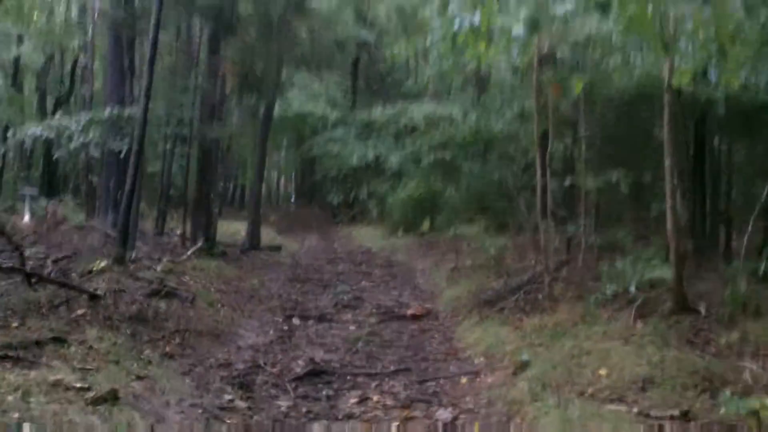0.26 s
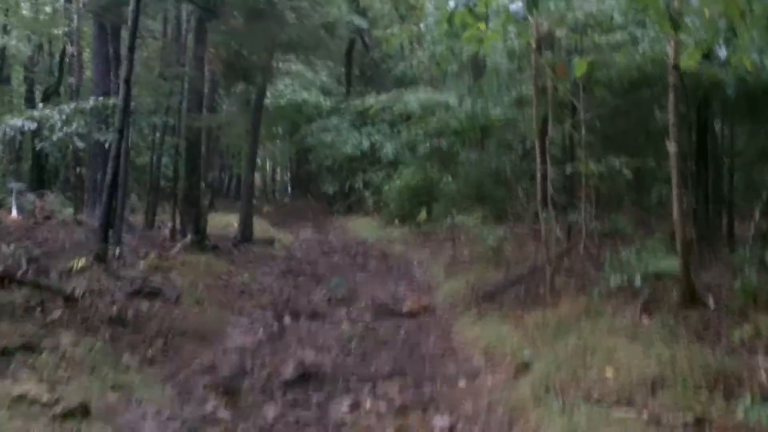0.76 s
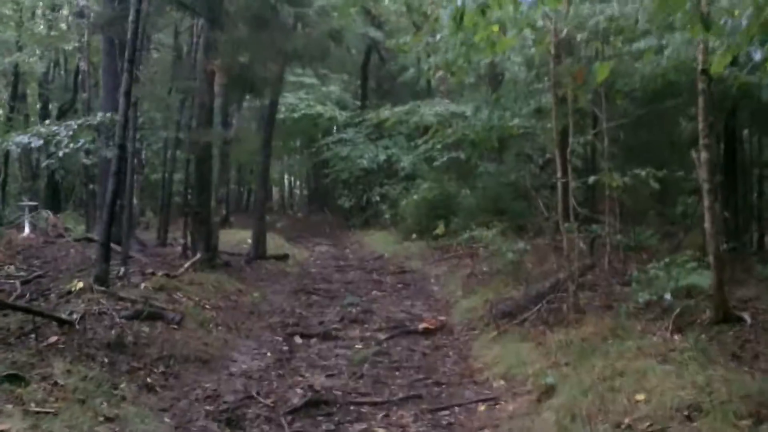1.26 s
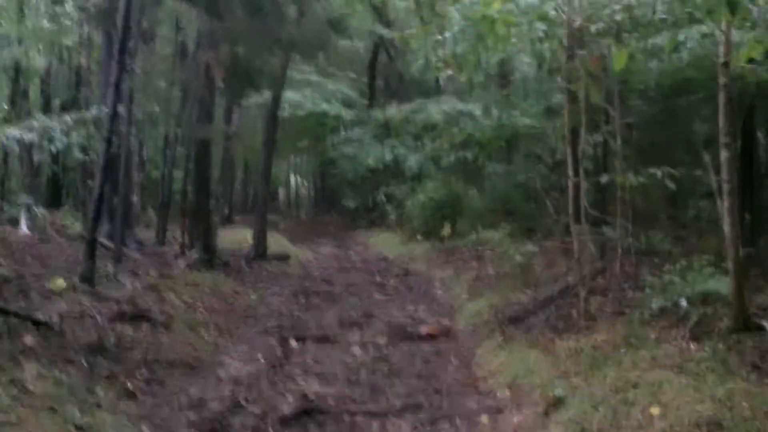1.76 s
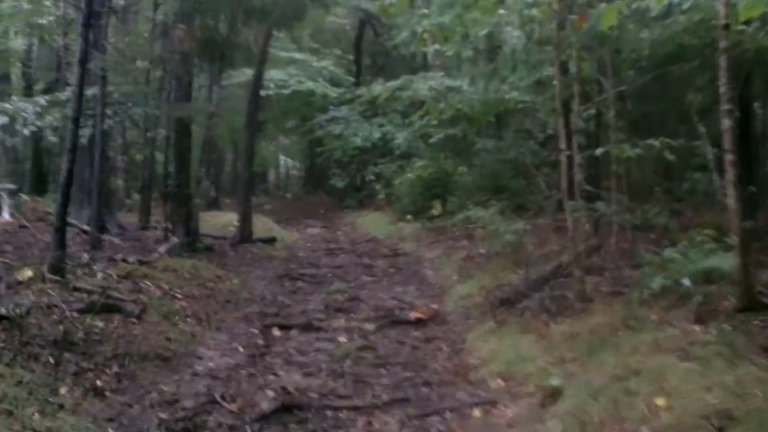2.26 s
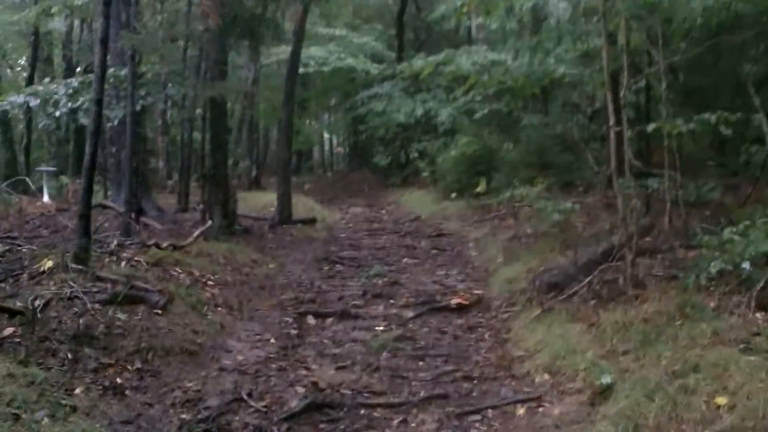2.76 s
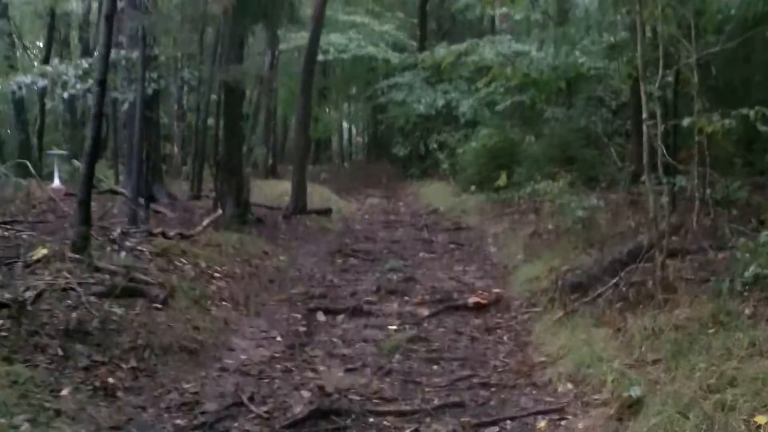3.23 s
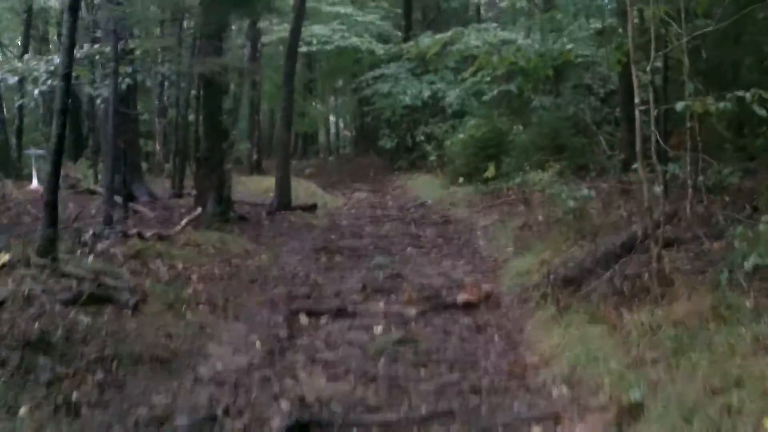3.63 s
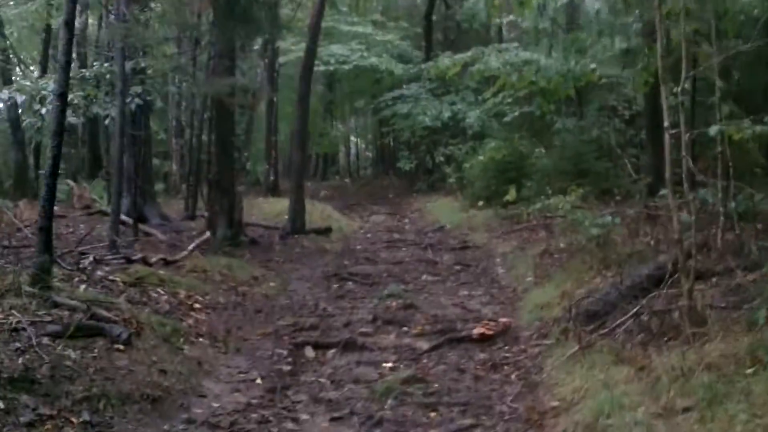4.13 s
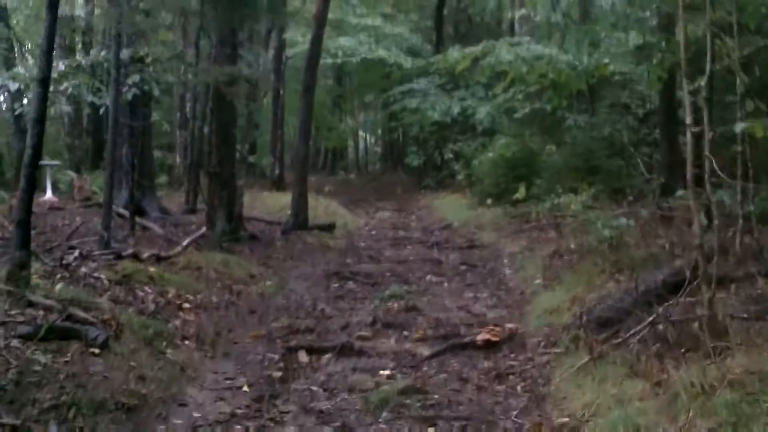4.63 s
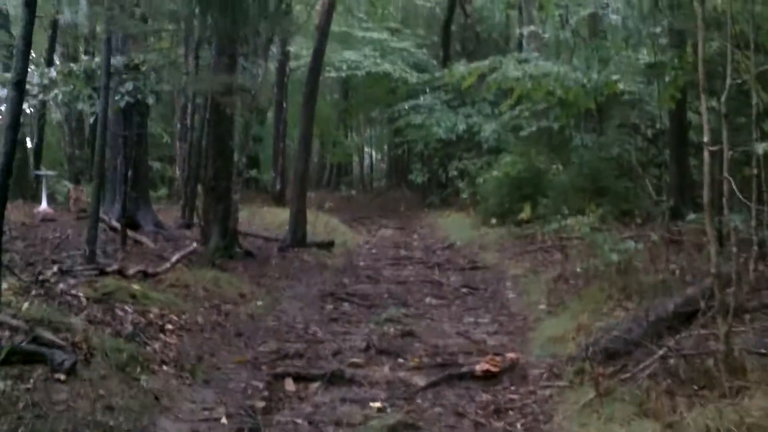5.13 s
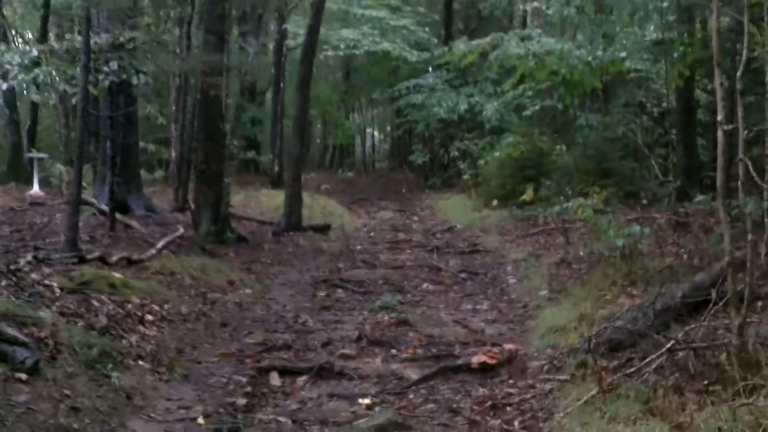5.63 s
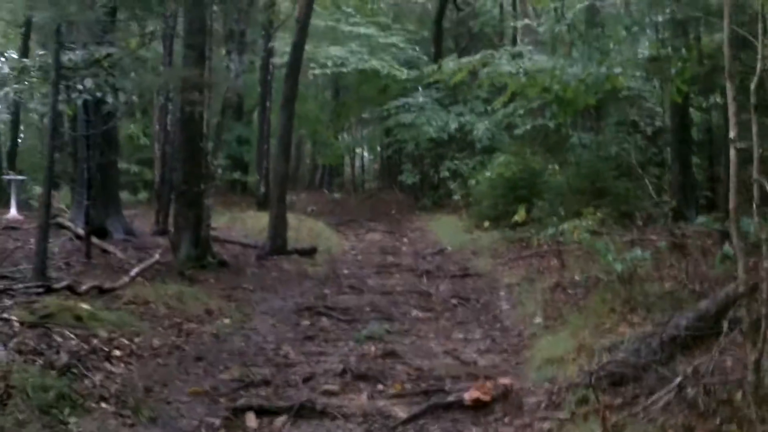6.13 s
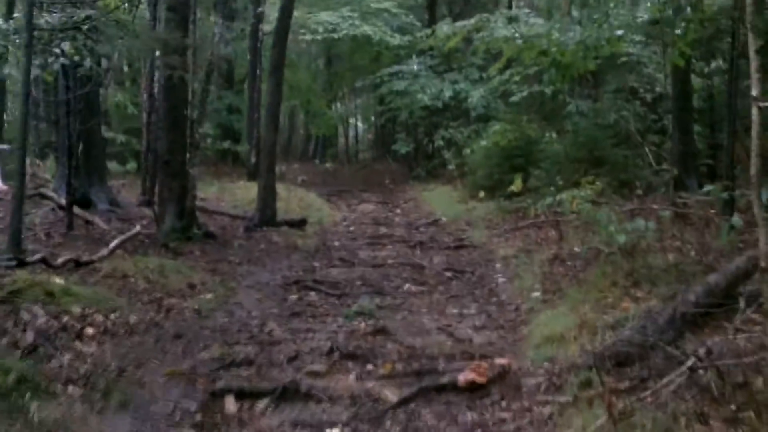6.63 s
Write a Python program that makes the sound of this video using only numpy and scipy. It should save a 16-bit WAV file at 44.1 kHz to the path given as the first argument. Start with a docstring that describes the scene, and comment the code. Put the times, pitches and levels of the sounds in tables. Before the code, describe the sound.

Soft dull footsteps and low microphone handling rumble on a wet forest trail, with water drops ticking on leaves and plopping into mud.

```python
"""Wet forest walk, hand-held

A slow walk along a trail after rain. The hand sways the camera with each pace, soft steps thud
up through the arm, and drops and jolts knock on the housing. Water flicks leaves and plops into
mud, grit ticks now and then, and countless far drops merge into a steady wash behind it all."""
import sys
import numpy as np
from scipy import signal
from scipy.fft import rfft, irfft, next_fast_len
from scipy.io import wavfile
from scipy.ndimage import uniform_filter1d, map_coordinates

SR = 44100
rng = np.random.default_rng(int(sys.argv[2]) if len(sys.argv) > 2 else 0)


def persist_wave(psi):
    """Save psi, clipped to +-1, as 16-bit WAV."""
    counts = np.round(np.clip(psi, -1, 1) * 32767).astype(np.int16)
    wavfile.write(sys.argv[1], SR, np.atleast_2d(counts).T)


N = 303408
HIT = 8192  # samples in the grid on which one-shots are built
HIT_HZ = np.fft.rfftfreq(HIT, 1 / SR)

# swings of the hand, once or twice a pace: (time [s], level [dB])
HAND_SWINGS = [(.1, -41.5), (.46, -34), (.8, -53), (1.17, -33.5), (1.44, -34.5), (2.0, -28.5), (2.499, -36),
               (2.85, -37.5), (3.5, -45), (3.95, -30), (4.2, -31), (4.68, -34), (4.95, -44), (5.41, -27.5),
               (6.19, -25.5), (6.8, -29.5)]
# fader ride of the grip's rumble: (time [s], level [dB])
GRIP_LEVEL = [(0, -43), (.2, -51), (.5, -47.5), (.8, -51.5), (1.2, -49), (1.68, -52), (1.9, -49),
              (2.35, -50), (2.85, -52.5), (3.35, -53), (3.6, -53.5), (3.8, -51), (4.15, -47), (4.4, -55.5),
              (4.7, -51.5), (5.1, -51), (5.4, -46.5), (5.65, -50), (6.2, -51), (6.4, -49), (6.88, -48.5)]
# tone of the sway, the grip, the far wash and the far patter: (frequency [Hz], level [dB])
SWAY_EQ = [(3, -33.5), (8, -12.5), (12, 2), (17, -10.5), (23, -18.5), (35, -29), (70, -64.5), (200, -120)]
GRIP_EQ = [(15, -15.5), (35, 8.5), (65, -0.5), (100, -6), (160, -12), (280, -23), (700, -49), (2000, -120)]
WASH_EQ = [(100, -37), (200, -3), (300, -0.5), (480, 2.5), (650, -1), (900, -11), (1300, -21), (3000, -57),
           (8000, -120)]
PATTER_EQ = [(300, -33), (900, 2), (1300, -0.5), (1780, 3), (2600, 0.5), (3600, 2.5), (4800, -5),
             (6500, -15), (10000, -14), (15000, -13.5)]
# resonances of the microphone's cavity that colour the hiss: (pitch [Hz], width [Hz], gain [dB])
CAVITY_MODES = [(1740, 110, -9.5), (2370, 140, -15), (4730, 250, -11)]
# soft footfalls and jolts through the arm: (time [s], peak [dB], pitch [Hz])
FOOTFALLS = [(0.071, -45, 90), (0.942, -39, 65), (1.06, -46, 110), (1.114, -44.5, 130), (1.192, -44, 111),
             (1.288, -29, 61), (2.041, -42, 74.6), (2.17, -36, 87), (2.591, -30.5, 131), (3.657, -41, 106),
             (4.95, -46, 133), (4.992, -44, 125), (5.366, -34, 90.5), (5.432, -38, 70), (5.49, -46, 110),
             (5.926, -37, 88.5), (6.179, -36.5, 111), (6.298, -49, 90.5), (6.595, -50, 95)]
# drops on near leaves and twigs: (time [s], flick peak [dB], pitch [Hz], damping [width / pitch])
LEAF_DROPS = [(.109, -55, 1900, .6), (.295, -49, 2000, .3), (.761, -47.5, 1750, 0.21),
              (.942, -45, 1720, .25), (1.071, -49, 2510, 0.56), (1.414, -52, 1250, 0.27),
              (1.47, -55, 4700, .2), (2.160, -43, 1920, .8), (2.344, -50, 2800, .4),
              (3.029, -46, 3200, 1.1), (3.686, -46, 2600, 0.69), (3.711, -50, 2430, 1),
              (3.788, -47, 2100, .4), (3.7996, -35.5, 2900, 0.7), (3.8380, -34.5, 2370, 0.43),
              (3.992, -47.5, 1800, .17), (4.077, -49, 2600, .8), (4.205, -47, 1300, 1.8),
              (4.399, -58, 3200, .5), (4.561, -45, 2800, 1), (4.613, -37, 2400, 0.74),
              (4.782, -40.5, 2530, 1.5), (5.2905, -36.5, 1950, 4), (6.000, -46.5, 2510, .8)]
# knocks on the housing: (time [s], shell gain [dB], shell pitch [Hz], shell width [Hz],
# contact cutoff [Hz], thump gain [dB], thump pitch [Hz], thump width [Hz], ring gain [dB],
# snap gain [dB], rebound delay [s], rebound gain [dB], hollow centre [Hz], hollow depth [0-1])
HOUSING_KNOCKS = [(0.3597, 17.5, 612, 119, 347, 18, 197, 290, -65, -35.7, 0.0026, -15.5, 439, .54),
                  (.6260, 32, 575, 333, 890, 25.5, 151, 190, -41, -30, .004, -25, 333, .92),
                  (2.2986, 6.5, 339, 842, 2570, 11.5, 134, 57, -55, -9, 0.0024, -25, 345, 0.27),
                  (2.6012, 43.5, 467, 314, 58.6, 35, 160, 75, -16.5, -39, 0.0054, -20, 345, 0.65),
                  (3.8392, 47, 420, 510, 31.3, 40.5, 85, 67, -60, -53, .0084, -15.5, 310, 0.75),
                  (4.2111, 34, 238, 112, 24, 34.5, 113, 47, -61, -50, 0.0054, -13, 320, 0.7),
                  (6.6644, 26, 330, 231, 82, 23, 125, 19, -38, -67, .0018, -11, 357, 1)]
# ringing modes of the housing: (pitch [Hz], level [dB], 60 dB decay [s])
HOUSING_MODES = [(692, 6.5, .033), (840, 1, 0.016), (1008, -14.5, 0.046), (1630, -6.5, .011),
                 (1720, -29, .04), (2260, -18.5, 0.0091), (3190, -15.5, 0.012)]
# the bite that a hard contact adds: (pitch [Hz], width [Hz], gain [dB])
SNAP_MODES = [(1835, 74, 12.5), (3080, 1140, 19), (5280, 670, -1.5), (10300, 9600, -3.5), (13700, 2000, -2)]
# drops on mud: (time [s], peak [dB], pitch [Hz], half-length [cycles])
MUD_DROPS = [(0.57, -43, 524, 0.39), (0.9418, -43, 563, 0.33), (1.119, -37.5, 370, 0.3),
             (1.2855, -46, 750, 0.3), (1.966, -43, 395, 0.47), (2.16, -42, 560, 0.47),
             (2.435, -39.5, 477, 0.41), (3.073, -36.5, 420, 0.39), (4.0995, -41.5, 580, 1.35),
             (4.205, -41.5, 560, .35), (5.089, -49.5, 910, 0.88), (5.3842, -40.5, 523, 0.31),
             (5.56, -46, 555, 0.96), (6.1772, -35.5, 392, 0.33)]
# tiny bright ticks of grit: (time [s], peak [dB])
GRIT_TICKS = [(2.604, -44), (3.029, -46), (3.7995, -47), (3.8373, -38), (4.205, -54)]
# the camera's deaf bands: (centre [Hz], width [Hz])
DEAF_BANDS = [(4200, 330), (7600, 900), (8900, 330), (12650, 500)]


def amp(db):
    """Decibels to gain."""
    return 10 ** (np.asarray(db) / 20)


def unit(x):
    """x at rms 1."""
    return x / np.sqrt(np.mean(x ** 2) + 1e-20)


def at_peak(x, db):
    """x scaled to a peak level."""
    return amp(db) * x / np.abs(x).max()


def wobble(rate):
    """A smooth random curve, rate knots a second."""
    return map_coordinates(rng.standard_normal(int(N * rate / SR) + 4), [np.arange(N) * rate / SR])


def filtered(x, response):
    """x through a filter given as a function of frequency."""
    size = next_fast_len(N + SR // 2)
    return irfft(rfft(x, size) * response(np.fft.rfftfreq(size, 1 / SR)), size)[:N]


def coloured(x, eq):
    """x through an EQ curve, at rms 1."""
    hz, db = np.transpose(eq)
    return unit(filtered(x, lambda f: amp(np.interp(np.log(f + 1), np.log(hz + 1), db))))


def even_noise(eq, window_s):
    """Coloured noise with its chance swells ironed out, at rms 1."""
    noise = coloured(rng.standard_normal(N), eq)
    size = int(window_s * SR) + 1
    power = np.abs(signal.hilbert(noise)) ** 2
    swells = uniform_filter1d(uniform_filter1d(power, size), size)
    return unit(noise / np.sqrt(np.abs(swells) + 1e-9))


def resonance(f, hz, width):
    """Response of one damped mode, 1 at its centre."""
    return 1j * f * width / (hz * hz - f * f + 1j * f * width)


def mode_bank(f, modes):
    """Response of several damped modes in parallel."""
    return sum(amp(db) * resonance(f, hz, width) for hz, width, db in modes)


def soft(f, hz):
    """Low-pass: a yielding contact passes little above hz."""
    return 1 / (1 + 1j * f / hz)


def impulse(response):
    """The one-shot that a response on the HIT_HZ grid gives when struck."""
    return irfft(response)[:HIT // 2]


def add(track, s, sound):
    """Mix a sound into the track at time s."""
    part = track[max(round(s * SR), 0):][:len(sound)]
    part += sound[:len(part)]


def hand_rumble(flutter_db=3, still_db=-35, swing_s=0.11):
    """The held camera sways harder with each swing, and the grip rumbles in uneven surges."""
    t = np.arange(N) / SR
    swings = sum(amp(db) * np.exp(-((t - s) / swing_s) ** 2) for s, db in HAND_SWINGS)
    sway = (amp(still_db) + swings) * even_noise(SWAY_EQ, window_s=0.14)
    grip_db = np.interp(t, *np.transpose(GRIP_LEVEL)) + flutter_db * wobble(rate=22)
    return sway + amp(grip_db) * even_noise(GRIP_EQ, window_s=0.25)


def far_dripping(wash_db=-58.5, drift_db=0.74, patter_db=-65, grain_db=-8, spread_db=3, count=1500):
    """Countless far drops merge into a wash and a hiss; the nearer ones stand out as faint grains."""
    when, size = rng.random((count, 2)).T
    drop_db = -spread_db * np.log(1 - 0.995 * size)  # many small, a few large
    drops = np.bincount((when * N).astype(int), amp(drop_db), N)
    hiss = coloured(rng.standard_normal(N), PATTER_EQ)
    patter = hiss + amp(grain_db) * coloured(drops, PATTER_EQ)
    patter = unit(filtered(patter, lambda f: 1 + mode_bank(f, CAVITY_MODES)))
    wash = coloured(rng.standard_normal(N), WASH_EQ)
    wash *= amp(wash_db + drift_db * wobble(rate=1.8))
    fade = amp(-0.28 * np.arange(N) / SR)  # the bed thins along the trail, 0.28 dB a second
    return fade * (wash + amp(patter_db) * patter)


def footsteps(width_hz=44):
    """Each footfall on soft ground arrives as one dull push."""
    out = np.zeros(N)
    for s, db, hz in FOOTFALLS:
        thud = impulse(resonance(HIT_HZ, hz, width_hz) * soft(HIT_HZ, 2 * hz) ** 2)
        add(out, s, at_peak(thud, db))
    return out


def leaf_drips(spray_db=-23, spray_t60=0.018, stray_count=10):
    """A drop flicks a leaf, then scatters in a brief spray; fainter strays fall at random."""
    out, t = np.zeros(N), np.arange(HIT) / SR
    # same columns as LEAF_DROPS
    strays = [(rng.uniform(0, N / SR), rng.normal(-55, 1.2), 2400 * 2 ** rng.normal(0, 0.24), 0.9)
              for _ in range(stray_count)]
    for s, db, hz, damping in LEAF_DROPS + strays:
        force = amp(spray_db - 60 * t / spray_t60) * rng.standard_normal(HIT)
        force[0] = 1  # the flick ahead of the spray
        leaf = impulse(resonance(HIT_HZ, hz, damping * hz) * soft(HIT_HZ, 2 * hz) ** 5)
        add(out, s, signal.fftconvolve(force, at_peak(leaf, db)))
    return out


def housing_knocks(hardness=28):
    """A blow and its quick rebound drive the shell and bounce the camera; the housing rings on."""
    out, f, t = np.zeros(N), HIT_HZ, np.arange(HIT) / SR
    ring = sum(amp(db - 60 * t / t60) * np.sin(2 * np.pi * hz * t) for hz, db, t60 in HOUSING_MODES)
    snap = mode_bank(f, SNAP_MODES)
    sheen = 1 + amp(-4) * resonance(f, hz=5030, width=55)  # a thin, high mode on every blow
    for (s, shell_db, shell_hz, shell_width, contact_hz, thump_db, thump_hz, thump_width,
         ring_db, snap_db, rebound_s, rebound_db, hollow_hz, depth) in HOUSING_KNOCKS:
        shell = amp(shell_db) * resonance(f, shell_hz, shell_width)
        thump = amp(thump_db) * resonance(f, thump_hz, thump_width)
        # a scooped band where the camera hardly moves, set by the spot struck
        hollow = 1 - depth * resonance(f, hollow_hz, width=136)
        attack = soft(f, hardness * contact_hz)  # a soft contact also rounds the transient
        body = (shell + thump) * hollow * soft(f, contact_hz) * attack
        blow = impulse((amp(snap_db) * snap - body) * sheen)
        tail = amp(ring_db) * impulse(rfft(ring) * attack)
        add(out, s, blow + tail)
        add(out, s + rebound_s, amp(rebound_db) * blow)
    return out


def mud_plops():
    """A drop sinks into mud: a dull plop that swells and dies within a few cycles."""
    out, t = np.zeros(N), (np.arange(HIT) - HIT // 2) / SR
    for s, db, hz, cycles in MUD_DROPS:
        swell = np.exp(-0.5 * (t * hz / cycles) ** 2)
        add(out, s + t[0], at_peak(swell * np.sin(2 * np.pi * hz * t), db))
    return out


def grit_ticks():
    """Grains of grit snap with one very short, bright click."""
    out = np.zeros(N)
    click = impulse(resonance(HIT_HZ, hz=12500, width=6500))
    for s, db in GRIT_TICKS:
        add(out, s, at_peak(click, db))
    return out


def scene():
    """The mono mix: camera handling, feet and near drops over the far forest bed."""
    camera = hand_rumble() + housing_knocks()
    feet = footsteps() + grit_ticks()
    near_drops = leaf_drips() + mud_plops()
    return (camera + feet + near_drops + far_dripping())[None]


def record(dry):
    """The camera has narrow deaf bands, a small peak in the treble, a soft ceiling and a band limit."""
    def microphone(f):
        notches = [np.abs(1 - resonance(f, hz, width)) ** 2 for hz, width in DEAF_BANDS]
        peak = np.abs(resonance(f, hz=4970, width=70)) ** 2
        return np.prod(notches, axis=0) * (1 + amp(-4) * peak)
    heard = filtered(dry[0], microphone)
    limited = heard / (1 + heard ** 8) ** (1 / 8)
    return filtered(limited, lambda f: 1 / np.sqrt(1 + (f / 15700) ** 120))[None]  # steep high cut


dry = scene()
out = record(dry)
persist_wave(out)
```